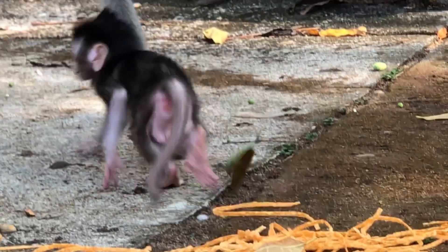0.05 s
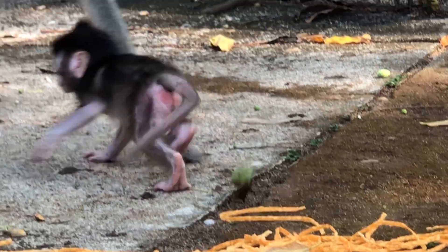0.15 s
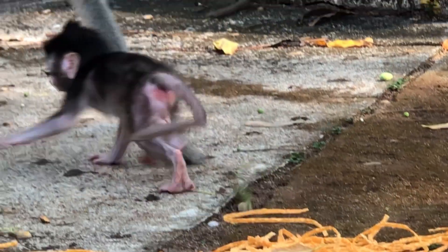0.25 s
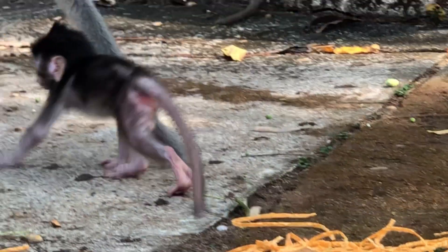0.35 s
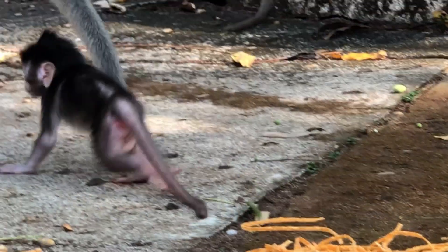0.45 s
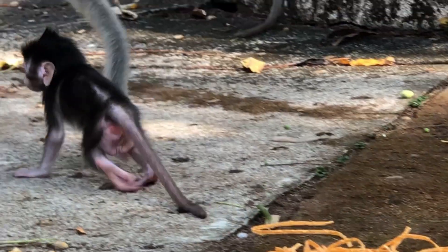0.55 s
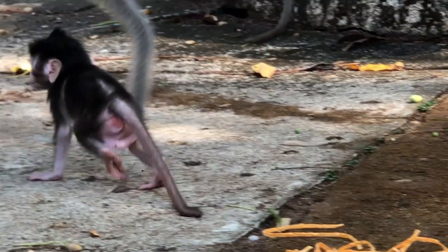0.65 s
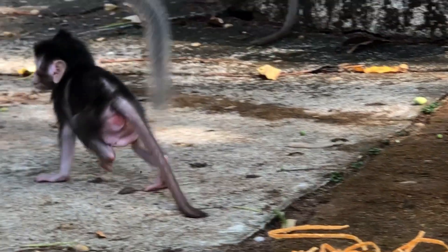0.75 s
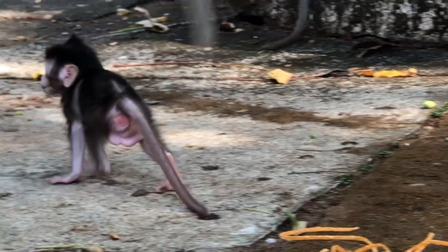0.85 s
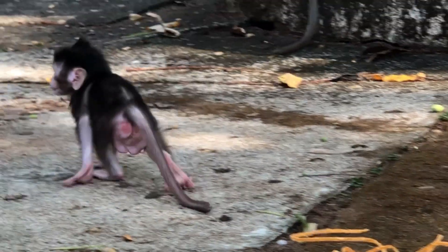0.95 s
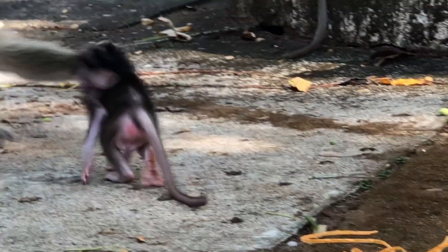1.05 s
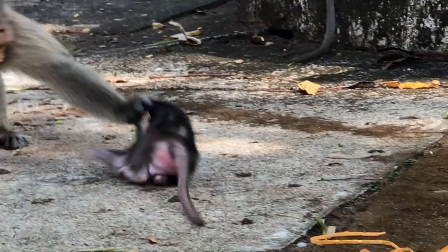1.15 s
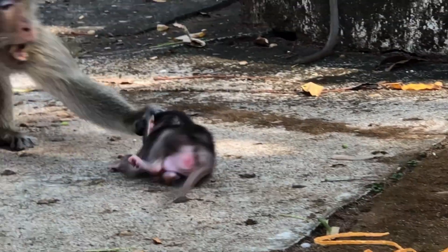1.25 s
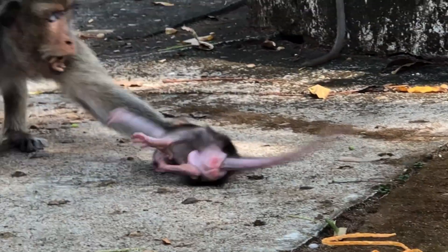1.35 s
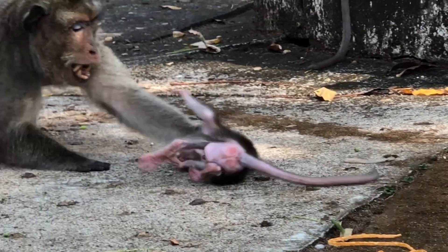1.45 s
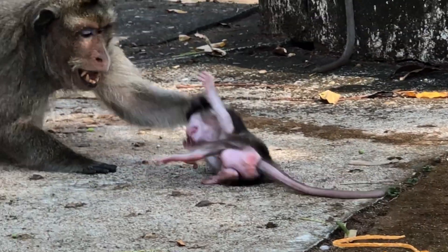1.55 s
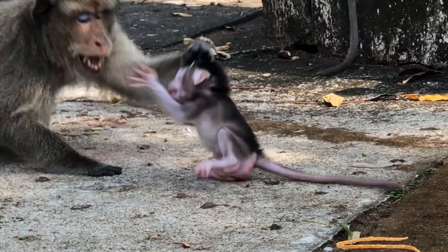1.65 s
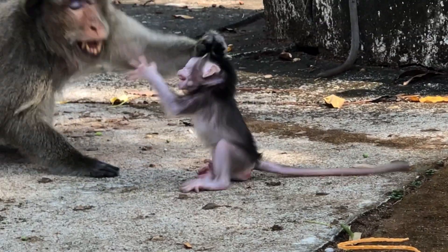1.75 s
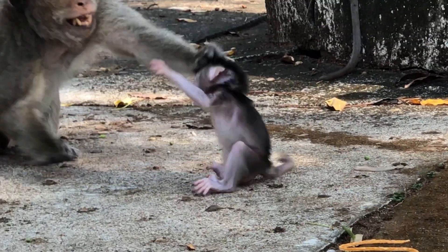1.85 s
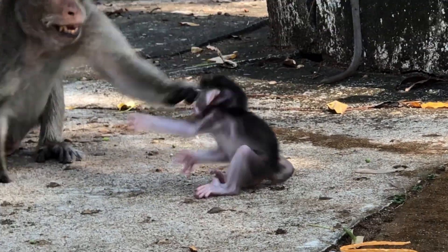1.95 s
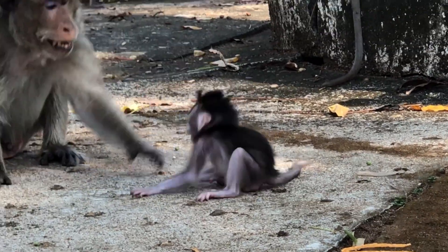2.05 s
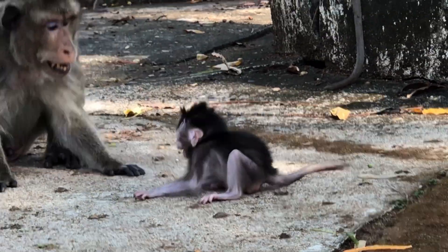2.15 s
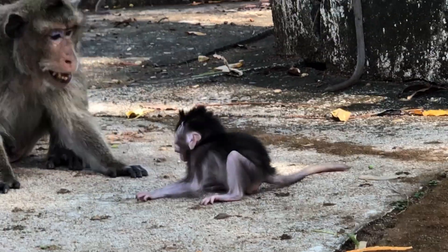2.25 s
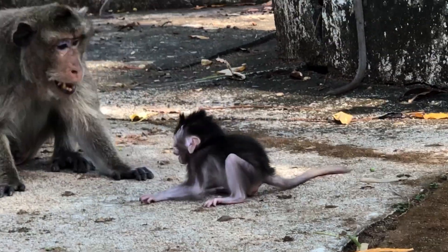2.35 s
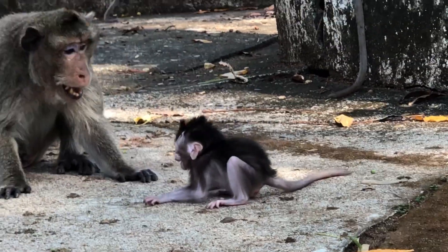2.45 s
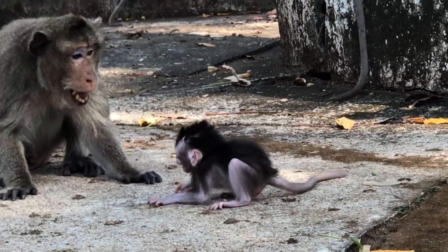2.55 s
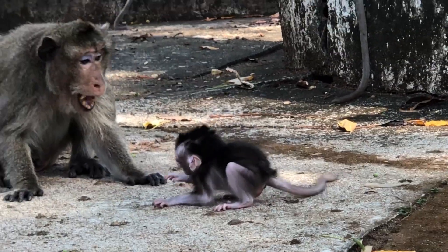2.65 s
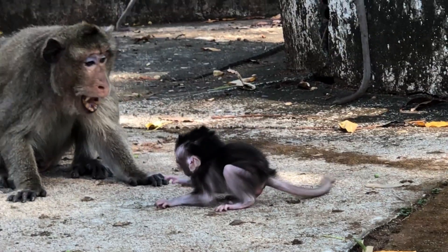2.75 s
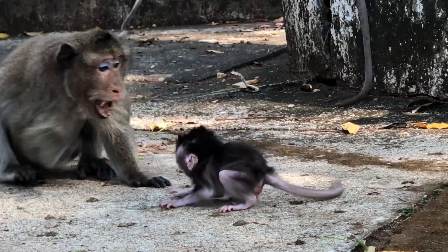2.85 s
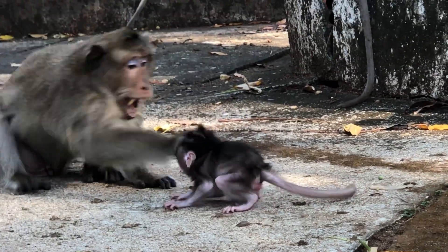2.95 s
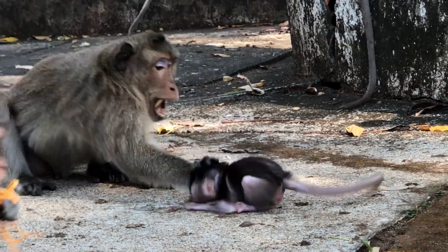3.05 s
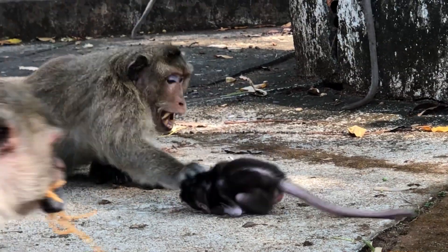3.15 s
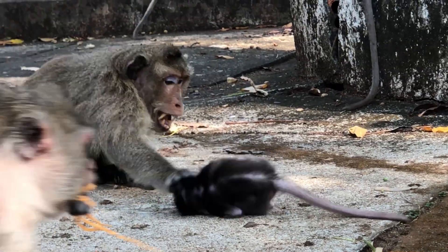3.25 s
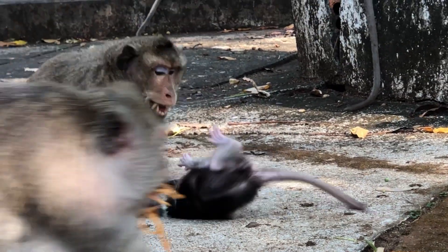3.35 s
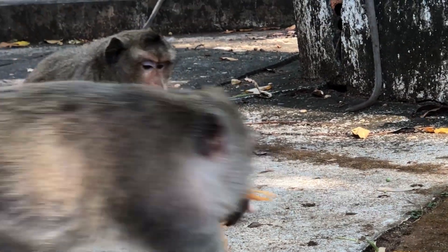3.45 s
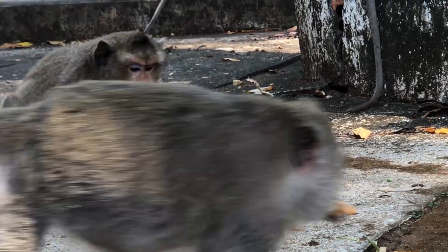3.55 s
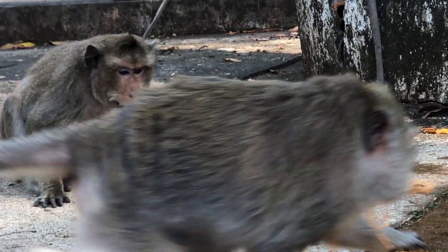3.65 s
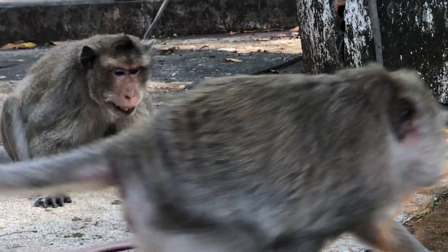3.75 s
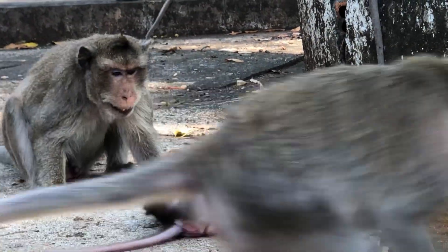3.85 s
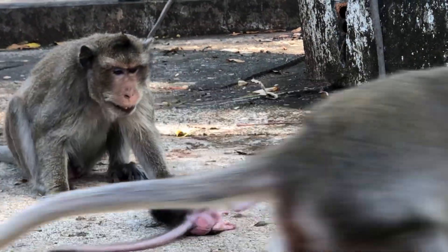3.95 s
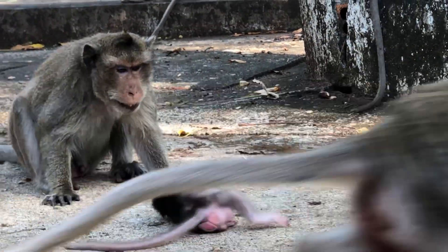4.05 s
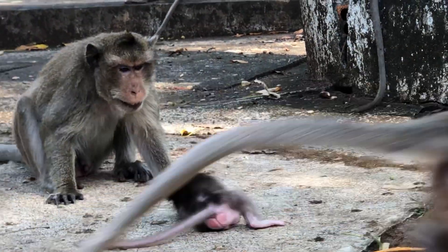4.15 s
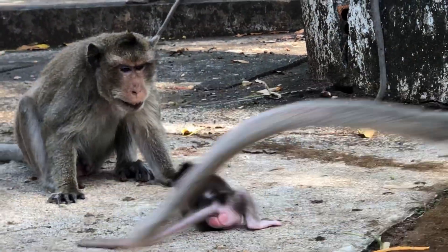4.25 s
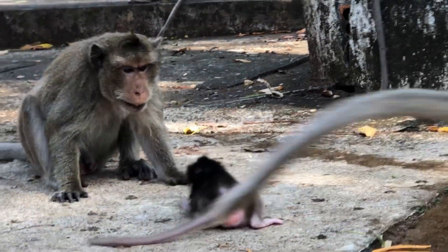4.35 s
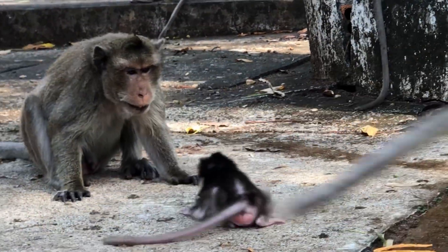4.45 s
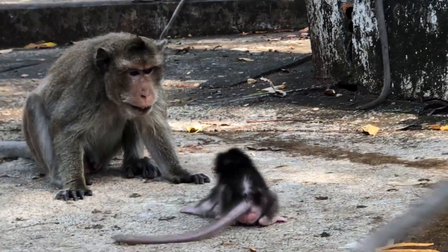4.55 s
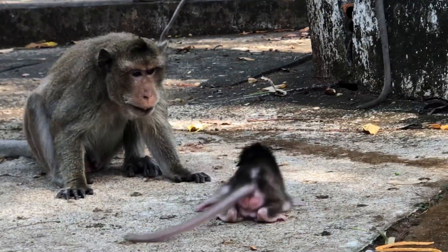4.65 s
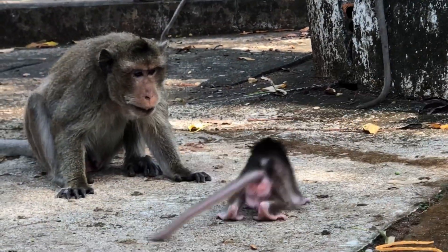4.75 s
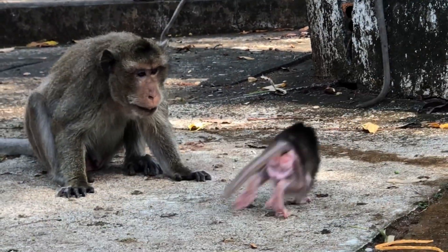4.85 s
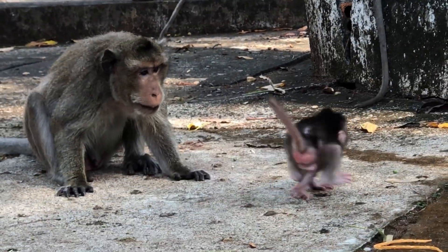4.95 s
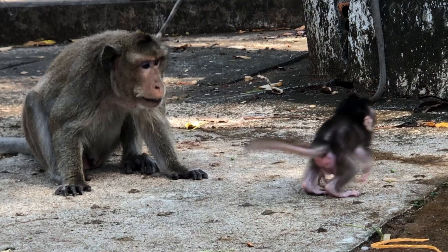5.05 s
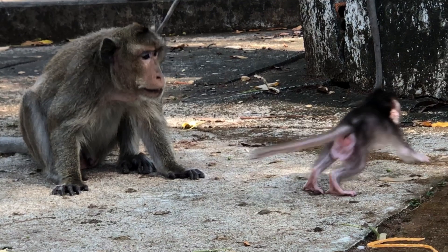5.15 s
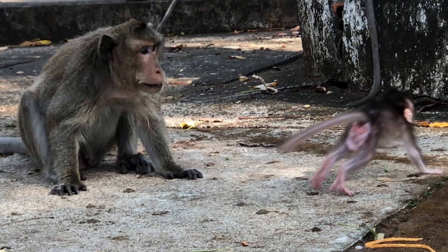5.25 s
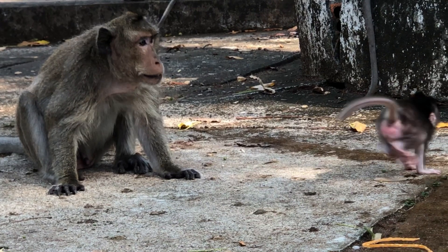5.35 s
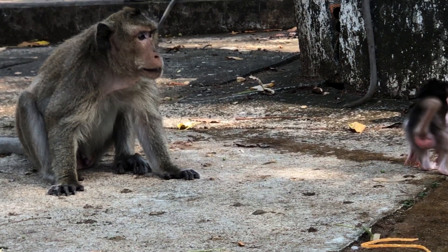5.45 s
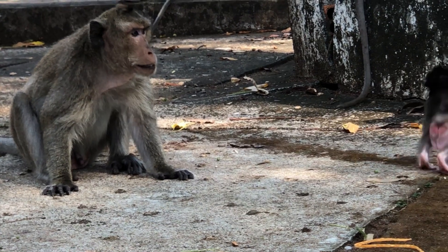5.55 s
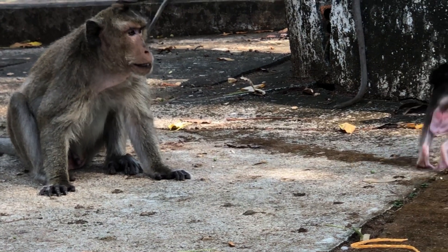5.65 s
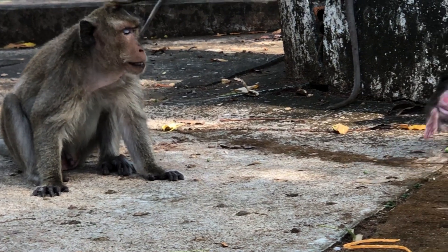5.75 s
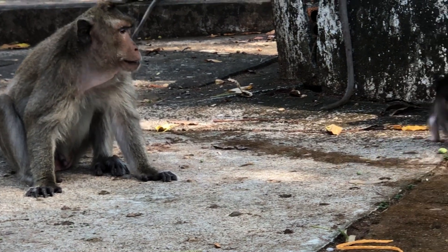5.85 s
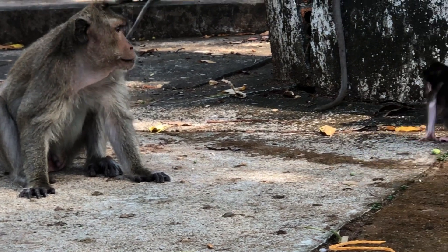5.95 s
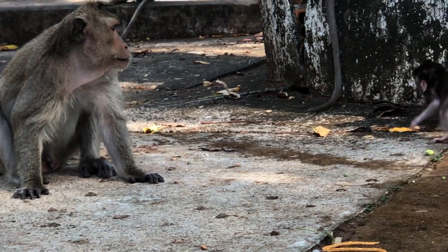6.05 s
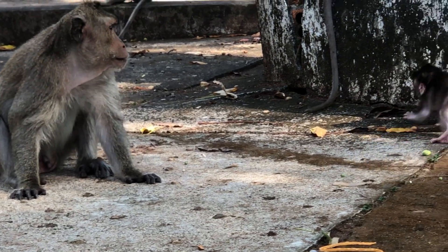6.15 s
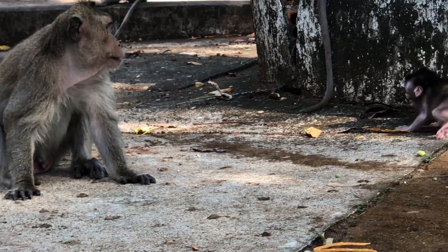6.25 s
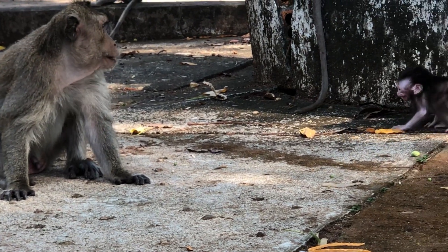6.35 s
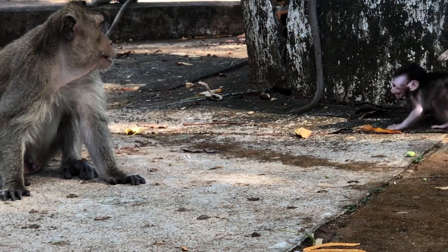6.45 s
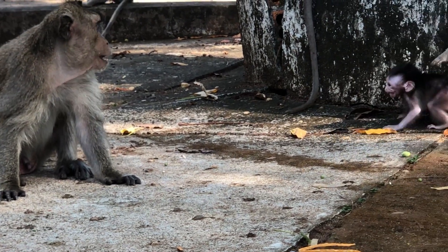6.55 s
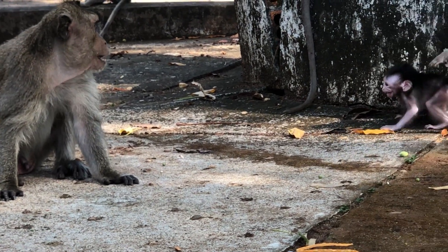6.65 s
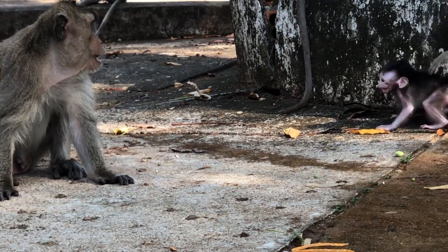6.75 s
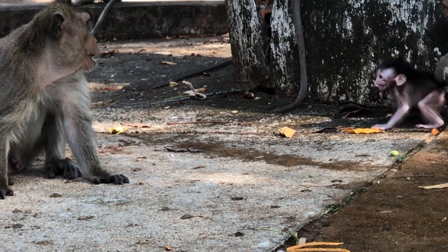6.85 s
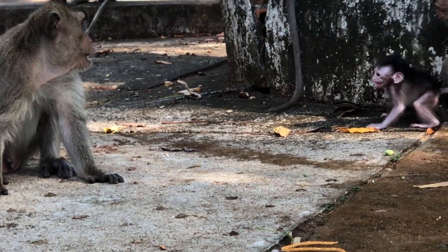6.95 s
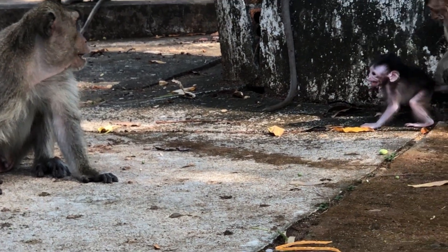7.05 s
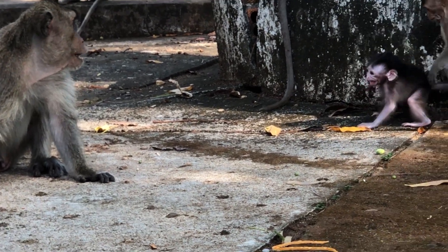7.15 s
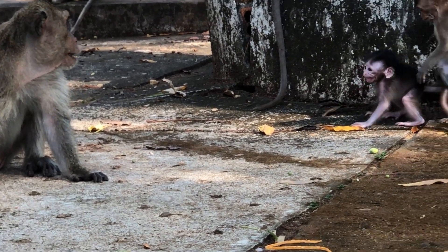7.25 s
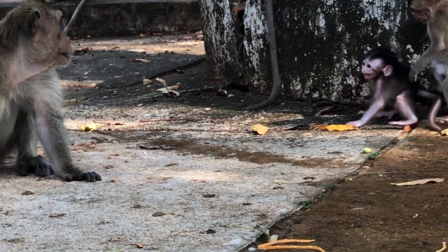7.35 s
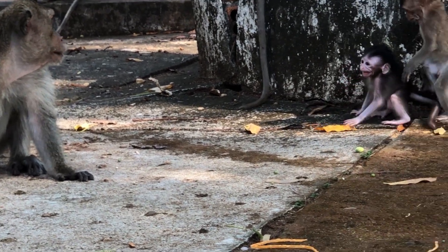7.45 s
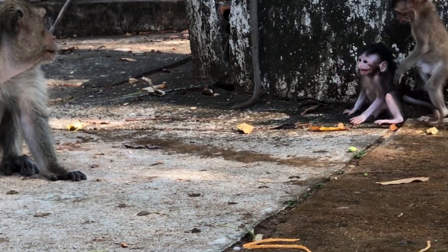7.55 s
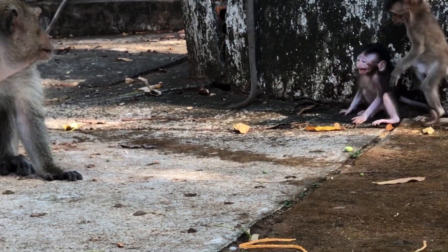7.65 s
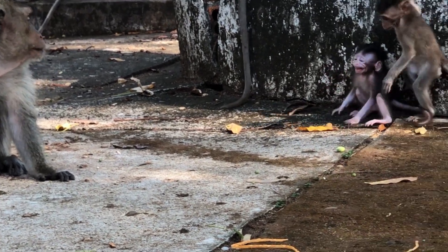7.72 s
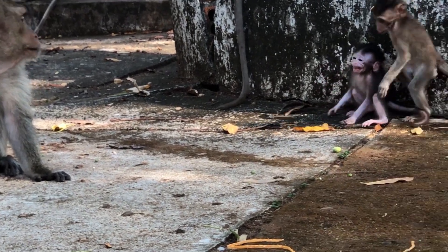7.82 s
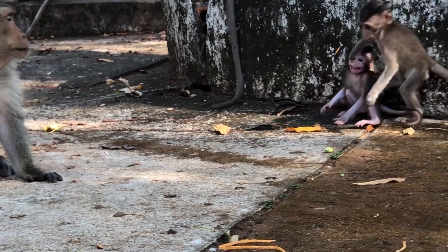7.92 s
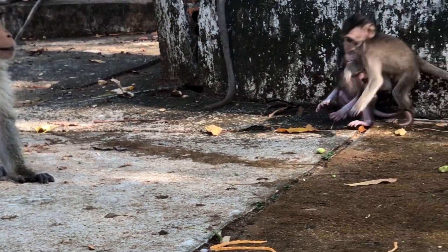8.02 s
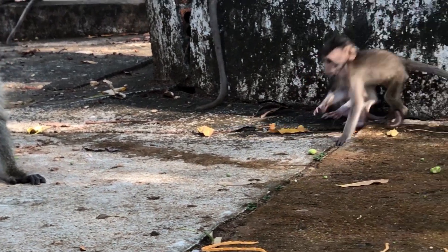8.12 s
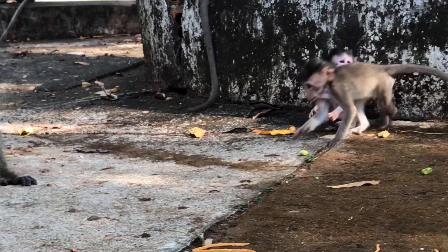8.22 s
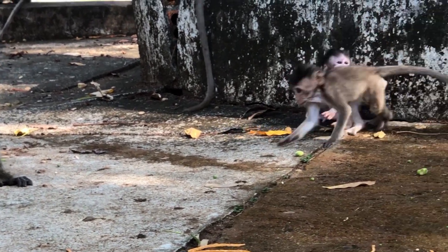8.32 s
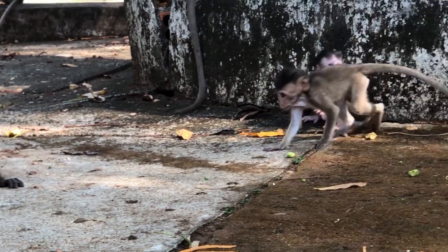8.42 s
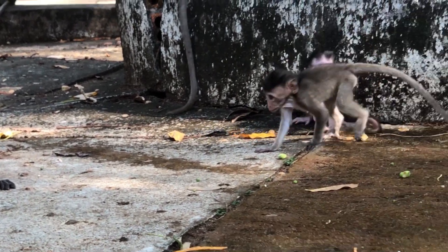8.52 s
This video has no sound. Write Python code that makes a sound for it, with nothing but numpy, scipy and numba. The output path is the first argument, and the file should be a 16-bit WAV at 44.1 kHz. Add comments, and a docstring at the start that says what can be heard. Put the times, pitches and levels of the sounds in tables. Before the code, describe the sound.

Over a soft outdoor hiss and low rumble, a baby monkey a few metres away breaks into sharp, high screams that turn rough and ring briefly off nearby walls. More short screams and thin squeaks follow, growing weaker, then a pause and two last cries. Light paw scuffs on concrete and small ticks of dry leaves fall between them, and a distant engine idles faintly during the first half.

```python
"""A concrete yard, one microphone a few metres from an infant macaque that screams as an adult pulls it about.
Thin whistles of tightly stretched vocal folds come alone or edge the short screams, whose pulsed voice
tips in and out of chaos and rings briefly off walls and trees. Paws scuff and dry litter ticks close by.
Behind them lie a low rumble, an even outdoor hiss and, at times, a far idling engine and faint hums."""
import sys
import numpy as np
from scipy import signal
from scipy.fft import rfft, irfft
from scipy.io import wavfile
from scipy.ndimage import uniform_filter1d
from numba import njit

SR = 44100
rng = np.random.default_rng(int(sys.argv[2]) if len(sys.argv) > 2 else 0)


def output_pcm(signal):
    """Save a mono or channel-first signal as 16-bit PCM at the path in sys.argv[1].

    Samples are clipped to [-1, 1] before scaling.
    """
    pcm = np.clip(np.atleast_2d(signal).T, -1, 1) * 32767
    wavfile.write(sys.argv[1], SR, np.round(pcm).astype(np.int16))


N = 378378
TIME = np.arange(N) / SR
WAVER, WAVER_PER_S = .004, 50  # no cry holds its pitch quite still: share of pitch, turns a second


def infant():
    """The infant, a few metres off: all its screams and squeals."""
    # Each row is a scream or part of a long one: start and length in seconds, pitch in Hz, final sag as
    # a share, peak in dB, seconds to the peak, swell and fade in dB, mouth resonance from and to in Hz,
    # calm roughness 0-1, seconds to the break, seconds broken, broken pitch in Hz, broken roughness 0-1.
    screams = [ (1.273, 0.13, 1571, 0.08, -13, 0.065, 7, 4, 4900, 4630, 0.06, .030, .12, 1496, 0.91),
               (1.391, 0.09, 1285, 0.12, -18, 0.057, -1, 7, 4900, 4600, .04, .079, .04, 1264, 0.67),
               (1.787, 0.17, 1622, .06, -20, 0.132, 4, 11, 4570, 5370, 0.33, .046, .15, 1324, 0.77),
               (3.113, 0.203, 1350, 0, -20.5, .050, 4.5, 6.5, 4000, 6530, 0.9, 0.019, .22, 1298, 0.94),
               (3.294, .205, 1975, .10, -26, 0.13, 4, 8.5, 6200, 4700, .33, .091, .14, 1500, 0.65),
               (3.845, 0.16, 1046, 0.06, -24.5, 0.026, 9, 4.5, 5630, 3460, 0, 0.04, .15, 1034, 0.54),
               (4.618, 0.2, 1070, 0.012, -24.5, 0.13, 8.5, 10, 4500, 5170, 0.17, 0.024, .17, 1071, 0.57),
               (5.192, 0.091, 1085, 0.045, -31, 0.044, 7.5, 12, 4650, 5100, 0.07, 0.029, .045, 1085, 0.72),
               (5.302, .054, 1100, 0.00072, -36, 0.026, -6, 12, 4400, 4430, 0.42, 0.0127, .06, 1100, .8),
               (5.629, 0.16, 1100, 0.095, -26, 0.11, 6, 16, 5670, 5540, 0.17, 0.028, .098, 1101, 0.8),
               (6.228, 0.21, 1080, 0.054, -27, 0.15, 10.5, 22, 5160, 5040, 0.02, .172, .03, 1015, 0.52),
               (8.504, 0.079, 1090, 0.027, -24, .075, 7.5, -0.5, 4700, 5200, 0.19, .025, .09, 1092, 0.65)]
    # Each row is the throat's shape in one scream, as pairs of frequency in Hz and gain in dB.
    throats = [
        [(900, -48), (1300, -40), (1550, -25), (2000, -11), (2850, -11), (3450, -12), (4100, 0), (4900, 0),
         (5900, -15), (7000, -14), (9700, -22), (11000, -31)],
        [(700, -68), (1250, -31.5), (2500, -5.5), (3750, 0), (5000, 5.5), (6200, -13), (7600, -17.5),
         (8800, -13.5), (11000, -51)],
        [(760, -75), (1300, -48), (2090, -7), (2590, -7), (2930, -8), (3600, 5), (4540, 3), (5140, 11.5),
         (6910, -3.5), (7970, -6.5), (9030, -2), (11000, -22.5), (14300, -71), (22000, -120)],
        [(760, -55), (1300, -41), (1710, -18), (1930, -19.5), (2500, -12), (3410, -7), (4880, -2.5),
         (5930, -1.5), (7220, -6.5), (7620, -17), (8870, -11), (11000, -22.5), (14300, -39), (22000, -120)],
        [(760, -73), (1300, -44), (1910, -22), (2540, -34), (2830, -7), (4920, -5.5), (5830, -3), (6320, -9.5),
         (7900, -15), (11000, -27), (14300, -77), (22000, -120)],
        [(820, -89), (1400, -51), (2650, -18.5), (2960, -13), (3680, -12.5), (4080, -3), (4480, -8), (5280, -6),
         (5810, -17.5), (11000, -36), (14300, -60), (22000, -120)],
        [(560, -62), (950, -25.5), (1590, -61), (1740, -41), (2840, -6.5), (3120, -9.5), (3640, -5),
         (4030, -5.5), (4990, -2.5), (7000, -13), (9520, -15.5), (11000, -42), (14300, -69), (22000, -120)],
        [(560, -47), (950, -9.5), (1870, -36), (2200, -20), (2730, -28), (3150, -2), (3710, -4), (4200, 8.5),
         (5370, 9.5), (9720, -4.5), (11000, -24), (14300, -58), (22000, -120)],
        [(820, -63), (1400, -33), (2050, -50), (2210, -31), (3430, -16), (4330, -4), (9250, -21), (11000, -54),
         (14300, -82), (22000, -120)],
        [(560, -60), (950, -24), (1310, -43), (1360, -25), (2200, -22), (2840, -19), (3450, -8.5), (4600, -1.5),
         (5260, 0.5), (8000, -11.5), (8680, -11), (11000, -21), (14300, -44), (22000, -120)],
        [(700, -64), (1060, -32.5), (2120, -33.5), (3190, -17), (4260, -9), (5320, -5), (6390, -9.5),
         (7450, -8.5), (8490, -19), (9590, -15), (10650, -31)],
        [(820, -49), (1400, -30), (1940, -45), (3320, -7), (3810, -13), (4260, -6), (4800, -6.5), (5860, -9.5),
         (11000, -35), (14300, -67), (22000, -120)],
    ]
    # Each row: start and length in seconds, seconds to the top, top pitch in Hz, top level in dB.
    squeals = [ (1.23, 0.029, 0.013, 2900, -49.5), (1.266, 0.015, 0.016, 4150, -22),
               (1.475, 0.019, 0.0038, 4020, -28.5), (1.775, 0.023, 0.0091, 4380, -35),
               (1.94, 0.017, 0.0033, 4480, -31), (2.584, 0.064, 0.03, 3930, -42.5),
               (3.837, 0.024, 0.018, 4170, -34), (3.99, 0.035, 0.015, 4240, -30.5),
               (4.601, 0.039, 0.014, 4270, -46), (4.796, 0.037, 0.0048, 4440, -36),
               (5.188, 0.06, 0.0223, 4340, -45), (5.26, 0.11, .036, 4390, -39.5),
               (6.231, 0.036, .020, 4350, -48), (7.761, .160, 0.057, 4240, -32),
               (8.48, .120, 0.0299, 4310, -36)]
    out = np.zeros(N)
    for row, throat in zip(screams, throats):
        add(out, *scream(row, throat))
    for row in squeals:
        add(out, *squeal(*row))
    return out


def scream(row, throat, mouth_width_hz=1000., tip_s=0.0064, full_voice_db=-13, treble_hz=6370):
    """Fold pulses ring the throat; the moving mouth sweeps one more resonance across them."""
    (start, length, pitch_hz, sag, peak_db, peak_s, swell_db, fade_db, mouth_from_hz, mouth_to_hz,
     calm_rough, break_s, broken_s, broken_hz, broken_rough) = row
    t, window = span(length, attack_s=0.0028, release_s=0.0048)
    # effort starts softly, builds to a peak, then gives out
    before, after = arch(t, peak_s, length)
    db = peak_db - 15 * np.exp(-t / 0.008) - swell_db * before - fade_db * after ** 1.9
    # overdriven folds tip into chaos, often at a lower pitch
    broken = np.clip(np.minimum(t - break_s, break_s + broken_s - t) / tip_s + .5, 0, 1)
    chaos = broken_rough * np.exp(-(t - break_s) / 0.48)  # eases as the air runs out
    onset_crack = 0.533 * np.exp(-(t / 0.00763) ** 2)
    rough = calm_rough + broken * (chaos - calm_rough) + onset_crack
    # in chaos the pitch hops between two registers, the wider the louder
    hops = .085 * broken * undb(db - full_voice_db) * np.tanh(2 * walk(190, len(t)))
    scoop = 0.0354 * np.exp(-t / 0.01398)
    late_sag = sag * (t / length) ** 2.6
    bend = hops + WAVER * walk(WAVER_PER_S, len(t)) - scoop - late_sag
    hz = (pitch_hz + broken * (broken_hz - pitch_hz)) * (1 + bend)
    voice = colour(folds(hz, np.clip(rough, 0, 1)), throat)
    mouth_hz = np.linspace(mouth_from_hz, mouth_to_hz, len(t))
    voice = voice + 0.53 * resonate(voice, mouth_hz, mouth_width_hz)
    # a softer voice is duller: the treble loses 0.3 dB more for each dB below the peak
    treble = signal.sosfiltfilt(signal.butter(4, treble_hz, "high", fs=SR, output="sos"), voice)
    voice = voice + treble * (undb(0.3 * (db - peak_db)) - 1)
    # lung pressure sets the power, however the folds vibrate
    power = uniform_filter1d(voice ** 2, int(0.011 * SR))
    steady = voice / np.sqrt(np.abs(power) + 1e-12)
    surge_db = 1.2 * rough * walk(60, len(t))
    return start, steady * undb(db + surge_db) * window


def folds(hz, rough, lurch=.065, jitter=.08, shimmer_db=2, breath=.12, rasp=.32, half_taps=8):
    """One sharp pulse per closure; roughness makes the pitch lurch and the cycles uneven."""
    n = len(hz)
    chance = rng.standard_normal((1024, 2))
    cycles = np.cumsum(hz * (1 + lurch * rough * walk(240, n))) / SR
    closures = np.interp(np.arange(1, int(cycles[-1])), cycles, np.arange(n))
    cycle_rough, period = rough[closures.astype(int)], SR / hz[closures.astype(int)]
    closures = closures + np.cumsum(jitter * cycle_rough * period * chance[:len(closures), 0])
    strength = undb(shimmer_db * cycle_rough * chance[:len(closures), 1])
    # each pulse falls between samples
    taps = closures.astype(int)[:, None] + np.arange(1 - half_taps, half_taps + 1)
    offset = taps - closures[:, None]
    shapes = strength[:, None] * np.sinc(offset) * np.cos(np.pi * offset / (2 * half_taps)) ** 2
    pulses = np.bincount(np.clip(taps, 0, n).ravel(), shapes.ravel(), n + 1)[:n]
    # turbulent air between the folds grows with the roughness
    return unit(pulses) + (breath + rasp * rough) * rng.standard_normal(n)


def squeal(start, length, top_s, top_hz, top_db, rise=.1, sag=0.056, swell_db=28, fade_db=31):
    """A thin whistle that climbs as the folds tighten and sinks as they slacken."""
    # Each row is a partial: multiple of the pitch, relative level in dB.
    partials = [(1, 0), (2, -22)]
    t, window = span(length, attack_s=0.0012, release_s=.003)
    before, after = arch(t, top_s, length)
    hz = top_hz * (1 + WAVER * walk(WAVER_PER_S, len(t)) - rise * before ** 2 - sag * after ** 2)
    db = top_db - swell_db * before ** 2 - fade_db * after ** 13
    return start, window * whistle(hz, db, partials, tremble=.0025, flutter_db=.6)


def litter():
    """Dry litter snaps under the animals."""
    # Each row: start in seconds, peak in dB before the gain, centre in Hz.
    ticks = [(1.052, -49.5, 4600), (2.9716, -44.5, 4720), (4.3824, -58, 4660), (4.4403, -47, 4940),
             (7.0082, -52.5, 4700), (7.4827, -62, 4550), (7.9494, -55, 4550)]
    return contacts(ticks, decay_s=0.0062, spread=0.67, gain_db=7.5)


def paws():
    """Paws land and brush on the concrete."""
    # Each row: start in seconds, peak in dB before the gain, centre in Hz.
    steps = [(3.03, -43, 520), (3.062, -46, 900), (3.235, -45, 800), (3.825, -43, 605), (4.02, -47, 1020),
             (4.343, -39.5, 2085), (4.363, -46, 940), (4.519, -41, 775), (4.893, -46.5, 1080),
             (5.085, -45.5, 2020), (6.086, -46, 666), (6.184, -43, 846), (6.902, -46, 1380)]
    return contacts(steps, decay_s=0.014, spread=1.23, gain_db=2.5)


def contacts(events, decay_s, spread, gain_db, grain_db=4.5):
    """Each contact crushes a little grit: a short grainy burst in one broad resonance."""
    out, t = np.zeros(N), TIME[:SR // 10]
    for start, db, hz in events:
        grit = rng.standard_normal(len(t)) * undb(grain_db * walk(800, len(t))) * np.exp(-t / decay_s)
        centre = np.full(len(t), float(hz))
        burst = resonate(resonate(grit, centre, spread * hz), centre, spread * hz)
        add(out, start, burst / np.abs(burst).max() * undb(db + gain_db))
    return out


def yard(direct, bounce_s=0.00095, early_db=-22, early_s=0.047, tail_db=-21, t60_s=0.89, dull_hz=8000):
    """A bounce off the concrete, a spray from the near wall and a faint tail from trees and buildings."""
    # The echo gains while the infant backs away from the microphone towards the wall.
    # Each row: time in seconds, gain into the echo in dB.
    echo_curve = [(1.3, -3), (1.9, 1.5), (3.3, 7.5), (6.3, 4), (8.5, -5)]
    t = TIME[:SR + SR // 2]
    early = rng.standard_normal(len(t)) * np.exp(-t / early_s) * (t > .005)
    tail = rng.standard_normal(len(t)) * np.exp(-np.log(1000) * t / t60_s) * (1 - np.exp(-t / 0.0026))
    tail = signal.sosfilt(signal.butter(1, dull_hz, fs=SR, output="sos"), tail)
    response = (undb(early_db) * unit(early) + undb(tail_db) * unit(tail)) / np.sqrt(len(t))
    bounce = 0.026 * np.interp(TIME - bounce_s, TIME, direct)
    echo_db = np.interp(TIME, *np.transpose(echo_curve))
    return direct + bounce + signal.fftconvolve(direct * undb(echo_db), response)[:N]


def air(split_hz=230, buffet_db=1.0, flicker_db=1.68, base_db=-47):
    """Open air: a low rumble that slowly eases and a smooth far hiss, each drifting on its own."""
    # Each row of the air's spectrum: frequency in Hz, relative level in dB.
    spectrum = [(13, -52), (22, -2.5), (77, -0.5), (172, -11.5), (241, -15.5), (337, -16.5), (598, -20),
                (906, -21), (1210, -25), (1600, -23), (2500, -27), (2920, -20.5), (4200, -21.5),
                (8930, -49), (11000, -59.5), (14300, -125), (22000, -120)]
    hz = np.arange(N // 2 + 1) * SR / N
    bins = rfft(rng.standard_normal(N)) * undb(spectrum_db(spectrum, hz))
    low_share = 1 / (1 + (hz / split_hz) ** 4)
    rumble, hiss = irfft(bins * low_share, N), irfft(bins * (1 - low_share), N)
    rumble_db = 3.5 - 0.24 * TIME + buffet_db * walk(26, N)
    hiss_db = -1.5 + flicker_db * walk(5.3, N)
    return (rumble * undb(rumble_db) + hiss * undb(hiss_db)) / np.std(rumble + hiss) * undb(base_db)


def engine(idle_hz=81, fade_s=0.52, waver_db=0.1):
    """A far engine idles, in earshot for a while; only its lowest two orders carry."""
    # Its time in earshot: start and length in seconds, level in dB.
    earshot = (0.61, 3.6, -49.5)
    start, length, db = earshot
    window = np.clip(np.minimum(TIME - start, start + length - TIME) / fade_s, 0, 1)
    phase = 2 * np.pi * np.cumsum(idle_hz * (1 + 0.014 * walk(4.625, N))) / SR
    hum = unit(np.sin(phase) + undb(-15) * np.sin(2 * phase))
    return window * hum * undb(db + waver_db * walk(5.7, N))


def far_tones(fade_s=0.21):
    """Faint hums from far off, perhaps traffic, blurred on their way."""
    # Each row: start and length in seconds, nominal pitch in Hz, glide as a share, level in dB.
    hums = [(.25, 0.56, 341, -.02, -62), (6.097, 3.3, 933, -0.029, -72), (6.499, 0.76, 376, -.025, -65.5),
            (8.148, 0.57, 395, 0.014, -64.5)]
    out = np.zeros(N)
    for start, length, nominal_hz, glide, db in hums:
        t, window = span(length, fade_s, fade_s)
        hz = 0.96 * nominal_hz * (1 + glide * (t / length - .5))
        add(out, start, window * whistle(hz, db, [(1, 0)], tremble=0.0325, flutter_db=4.5))
    return out


def whistle(hz, db, partials, tremble, flutter_db):
    """A nearly pure, slightly trembling tone."""
    phase = 2 * np.pi * np.cumsum(hz * (1 + tremble * walk(280, len(hz)))) / SR
    tone = sum(undb(part_db) * np.sin(k * phase) for k, part_db in partials)
    return unit(tone) * undb(db + flutter_db * walk(110, len(hz)))


@njit
def resonate(x, hz, width_hz):
    """Band-pass whose centre may move every sample."""
    y, band_state, low_state = np.empty(len(x)), 0., 0.
    for i in range(len(x)):
        tuning, damping = np.tan(np.pi * min(hz[i], .45 * SR) / SR), width_hz / hz[i]
        band = (band_state + tuning * (x[i] - low_state)) / (1 + tuning * (tuning + damping))
        band_state = 2 * band - band_state
        low_state += 2 * tuning * band
        y[i] = damping * band
    return y


def colour(x, points, size=1024):
    """Causal filter with the given spectrum."""
    hz = np.arange(size // 2 + 1) * SR / size
    cepstrum = irfft(np.log(undb(spectrum_db(points, hz))))
    cepstrum[1:size // 2] *= 2
    cepstrum[size // 2 + 1:] = 0
    return signal.fftconvolve(x, irfft(np.exp(rfft(cepstrum))))[:len(x)]


def spectrum_db(points, hz):
    """A spectrum read on a log-frequency axis."""
    point_hz, db = np.transpose(points)
    return np.interp(np.log(np.maximum(hz, 1)), np.log(point_hz), db)


def arch(t, top_s, length):
    """How far a cry is before its top (1 to 0) and past it (0 to 1)."""
    return np.clip(1 - t / top_s, 0, 1), np.clip((t - top_s) / max(length - top_s, 1 / SR), 0, 1)


def span(length, attack_s, release_s):
    """The time since an event began, and a window with soft ends."""
    t = TIME[TIME <= length]
    return t, np.clip(np.minimum(t / attack_s, (length - t) / release_s), 0, 1)


def walk(turns_per_s, size):
    """Smooth random motion, spread near 1."""
    position = np.arange(size) * turns_per_s / SR
    return 1.2 * np.interp(position, np.arange(4096), rng.standard_normal(4096))


def add(out, start_s, x):
    """Mix x into out from start_s on."""
    i = int(np.clip(round(start_s * SR), 0, N - 1))
    out[i:i + len(x)] += x[:N - i]


def undb(db):
    """Decibels to gain."""
    return 10 ** (np.asarray(db) / 20)


def unit(x):
    """Scale to rms 1."""
    return x / np.sqrt(np.mean(x ** 2) + 1e-18)


def scene():
    """At the microphone, in mono: the monkeys in the yard over the far background."""
    scuffle = litter() + paws()
    return (yard(infant() + scuffle) + air() + engine() + far_tones())[None]


def record(dry, top_hz=11100):
    """The recorder cuts the top steeply."""
    return signal.sosfilt(signal.ellip(12, .2, 70, top_hz, fs=SR, output="sos"), dry)


dry = scene()
out = record(dry)
output_pcm(out)
```